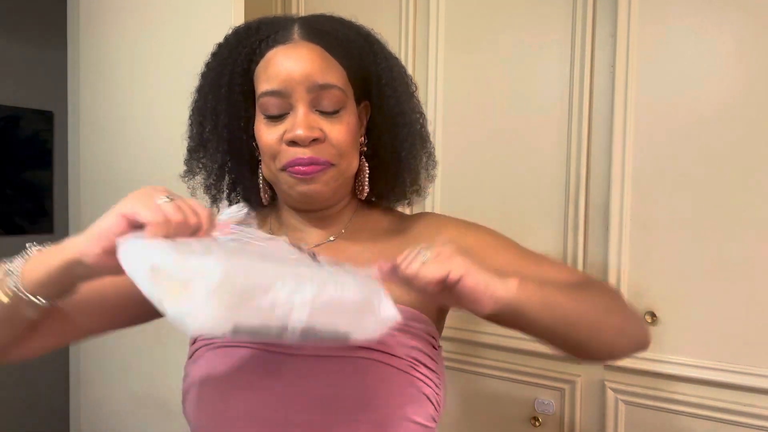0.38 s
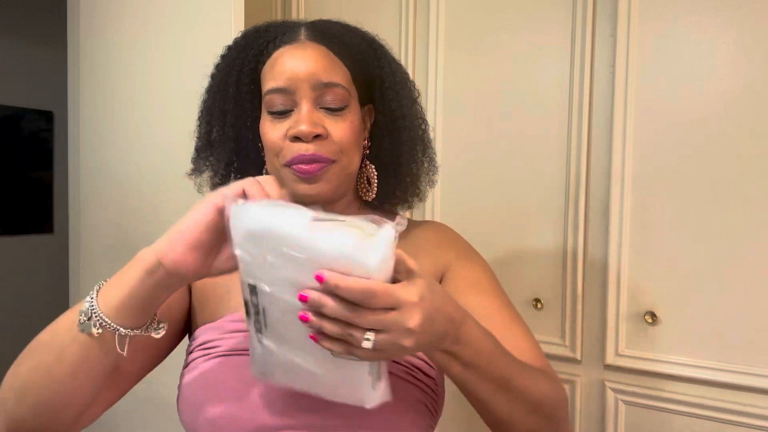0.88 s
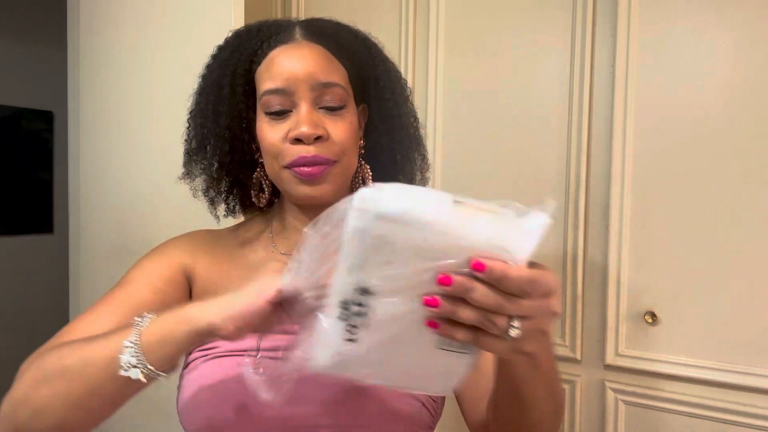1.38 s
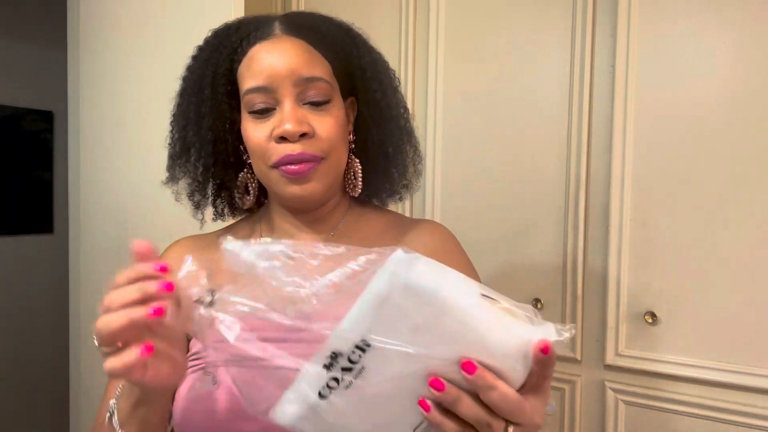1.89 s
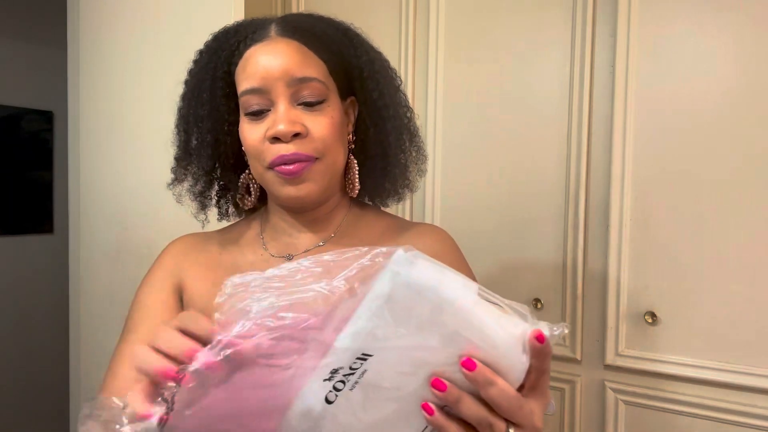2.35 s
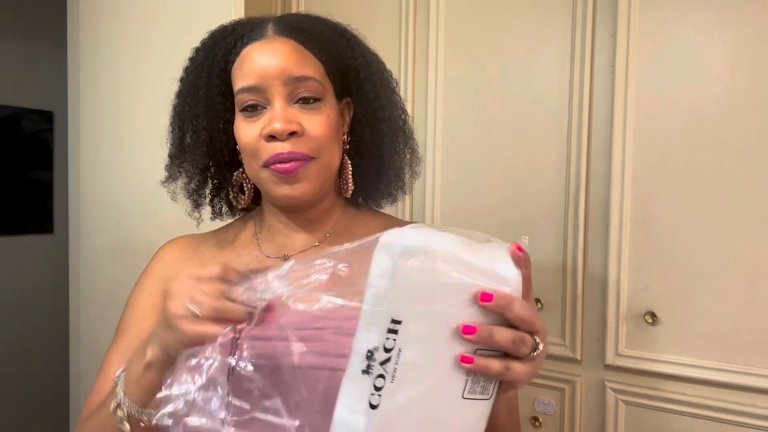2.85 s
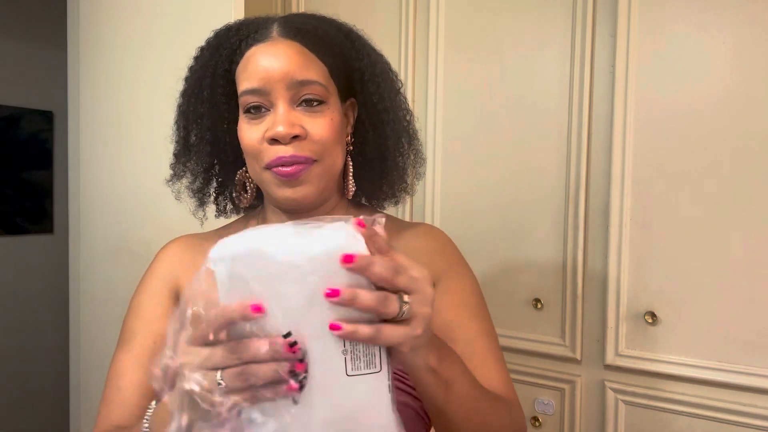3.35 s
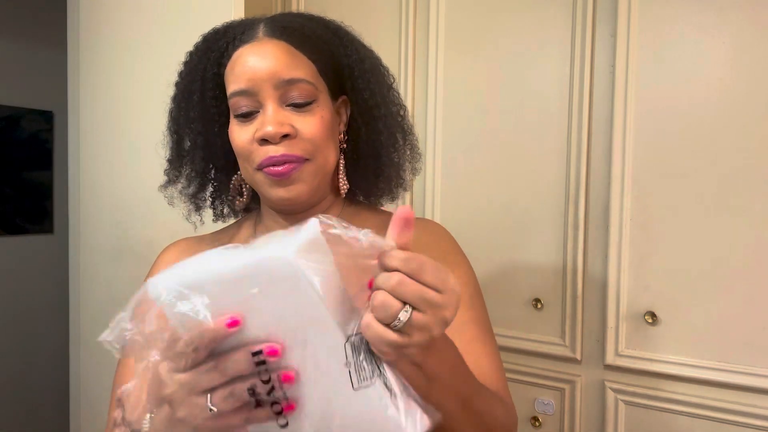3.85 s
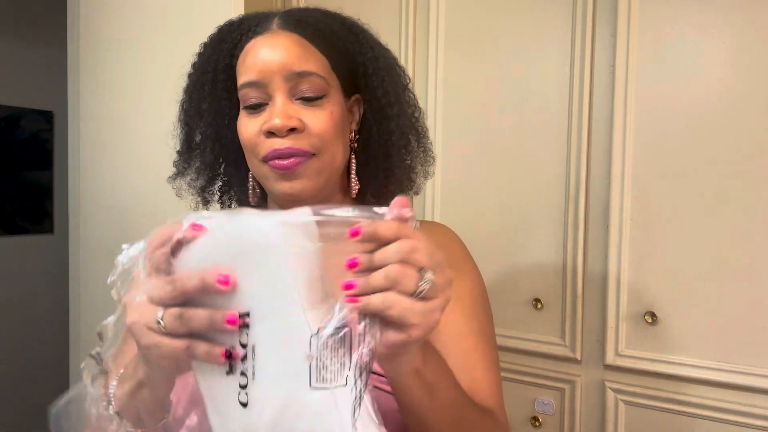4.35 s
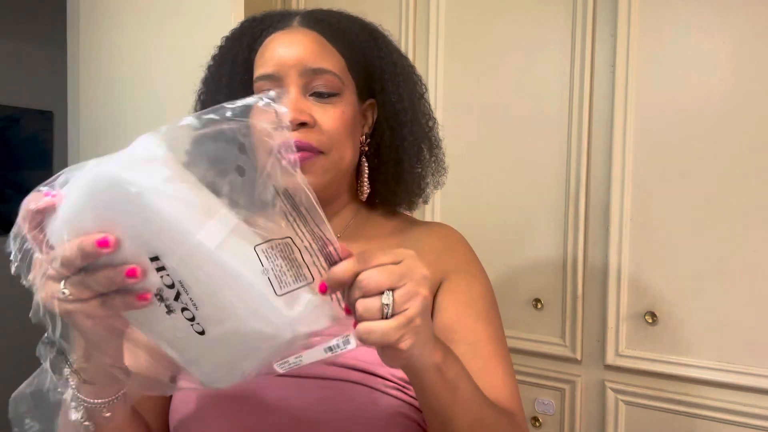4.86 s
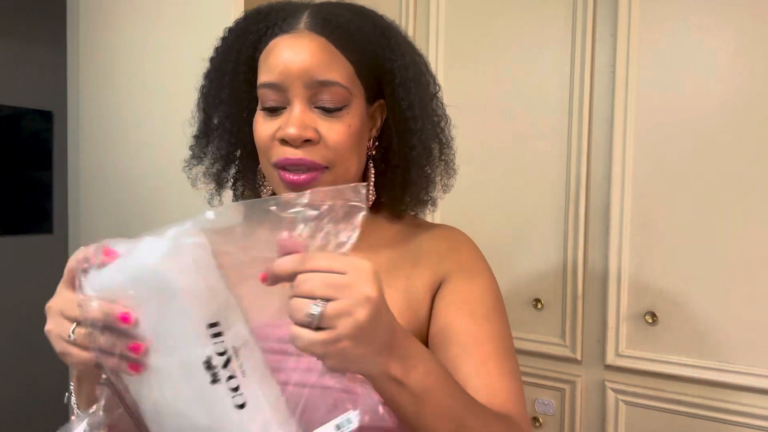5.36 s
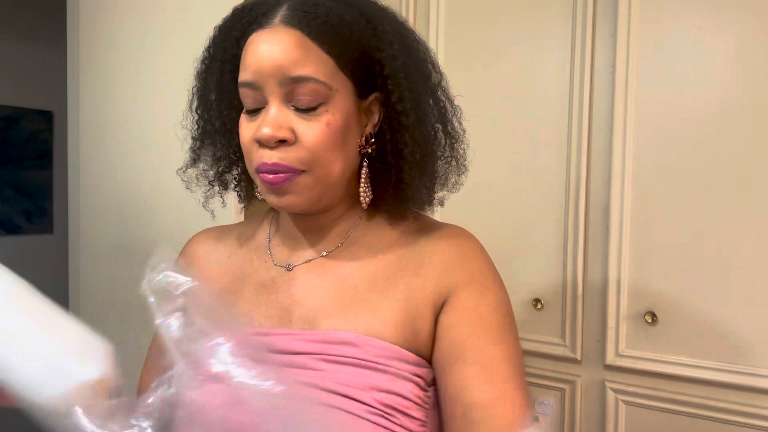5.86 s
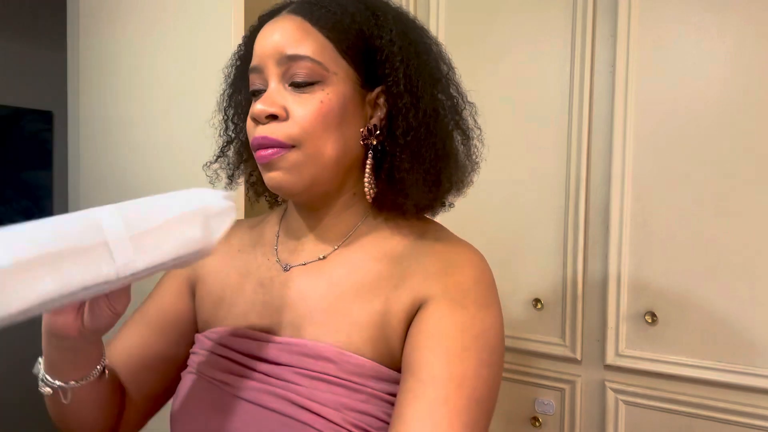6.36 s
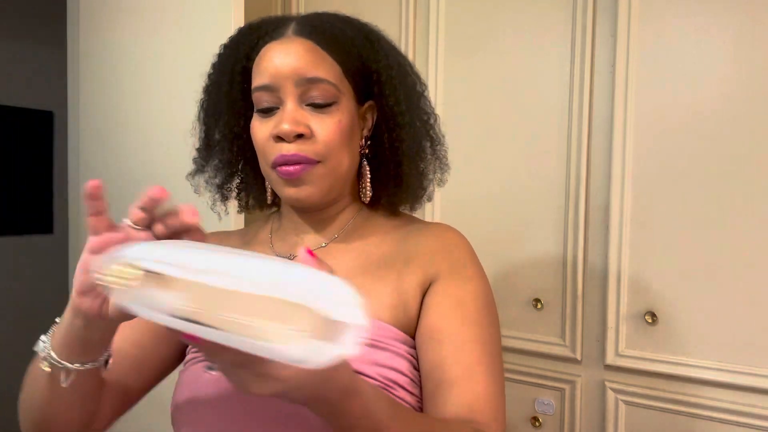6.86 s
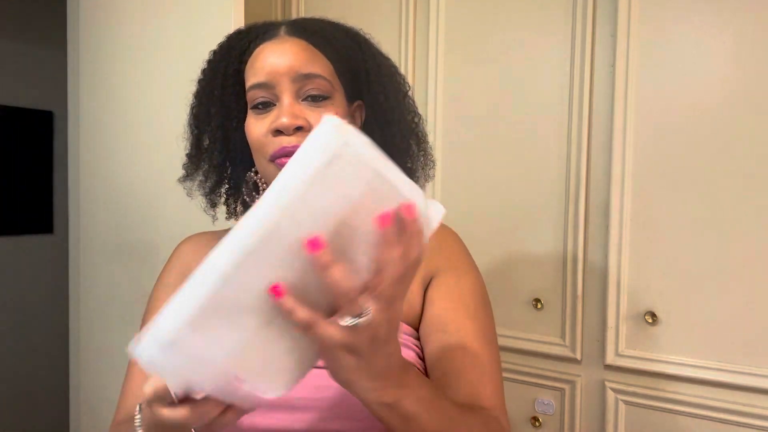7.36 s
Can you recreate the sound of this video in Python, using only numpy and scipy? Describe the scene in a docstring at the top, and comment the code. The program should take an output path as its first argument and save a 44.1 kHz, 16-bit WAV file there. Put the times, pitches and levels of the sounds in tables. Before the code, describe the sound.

A bright, dry rip of plastic film bursts out, then hands crumple and peel the bag away in uneven bursts of crackle, with lone ticks and snaps over it. Muffled bumps and hollow pops come from the parcel, and bracelet charms clink faintly. It ends with much quieter rustling and light handling thuds. Close stereo microphone, short room tails, barely audible hush beneath.

```python
"""In a small furnished room, a thin plastic mailer is ripped open, then pulled and crumpled off a soft parcel.
Random buckles ring many sizes of film patch for the crackle; short noise bursts make the lone snaps. The bag
pops hollow on struck modes, lumpy noise rings the squeezed parcel in low puffs, and bracelet charms clink as
decaying sines. A faint hush lies below. The stereo image varies with pitch, with short tails."""
import sys
import numpy as np
from scipy import signal
from scipy.fft import rfft, irfft, next_fast_len
from scipy.io import wavfile

SR = 44100
rng = np.random.default_rng(int(sys.argv[2]) if len(sys.argv) > 2 else 0)


def put_to_file(sound):
    """Save the sound as 16-bit audio at rate SR, in the file named by the first command-line argument."""
    columns = np.atleast_2d(sound).T  # one column per channel
    safe = np.clip(columns, -1, 1)
    whole_steps = np.round(safe * 32767)
    wavfile.write(sys.argv[1], SR, whole_steps.astype(np.int16))


N = 340716   # length in samples


def from_db(db):
    """Decibels to gain."""
    return 10 ** (np.asarray(db) / 20)


def rms_one(x):
    """Scale to unit rms."""
    return x / np.sqrt(np.mean(x ** 2) + 1e-20)


def at_hz(points, hz, column=1):
    """Read a table column along log frequency."""
    points = np.array(points)
    return np.interp(np.log(hz), np.log(points[:, 0]), points[:, column])


def filtered(x, order, edges_hz, kind="band"):
    """Butterworth filter along the last axis."""
    return signal.sosfilt(signal.butter(order, edges_hz, kind, fs=SR, output="sos"), x)


def drift(rate_hz):
    """Slow random wander of unit rms: noise through two equal low-pass poles."""
    r = np.exp(-2 * np.pi * rate_hz / SR)
    noise = rng.standard_normal(N + 9000)
    return rms_one(signal.lfilter([1], [1, -2 * r, r * r], noise)[9000:])   # drop the filter's run-in


def ring(clicks, hz, t60):
    """A resonator: each unit click starts a decaying sine of height 1."""
    r = from_db(-60 / (t60 * SR))
    w = 2 * np.pi * hz / SR
    return signal.lfilter([0, np.sin(w)], [1, -2 * r * np.cos(w), r * r], clicks + 1e-18)


def swells(s, db, swell_db, fade_db, rest_db):
    """Level in dB over time: gestures swell and fade evenly in dB, and their powers add over a rest level."""
    t = np.arange(0, N + 32, 32) / SR
    tenths = 10 * (t - s[:, None])
    drop_db = np.maximum(-tenths * swell_db[:, None], tenths * fade_db[:, None])
    each_db = db[:, None] - drop_db
    power = np.sum(from_db(2 * each_db), axis=0) + from_db(2 * rest_db)
    return np.interp(np.arange(N) / SR, t, 10 * np.log10(power))


# grips and pulls on the film: t of peak/s, crackle level/dB, swell/dB per 0.1 s, fade/dB per 0.1 s,
# large-fold level/dB re crackle before the folds trim
GRIPS = [(0.0, -41, 1, 12.5, -8), (0.197, -50, 69.5, 40, 12), (0.234, -19.5, 97, 23.5, -13),
         (0.263, -23, 27.5, 17, 2), (0.447, -39.5, 9, 8, 2), (0.776, -50.5, 26, 10, -3),
         (0.879, -41.5, 25, 13, -5), (1.097, -38.5, 21.5, 18, 1.5), (1.205, -52, 42, 2, -2),
         (1.276, -32.5, 148.5, 18, -4), (1.325, -32.5, 58, 16, 2.5), (1.465, -37.5, 7.5, 14.5, 11),
         (1.66, -37.5, 6.5, 15, 0), (1.715, -39, 14, 27, -3), (1.842, -43, 12.5, 18.5, 3.5),
         (2.11, -65.5, -0.5, 45, 0), (2.204, -46.5, 250, 19.5, 5), (2.228, -50.5, 86, 26, -5),
         (2.361, -53.5, 14.5, 42, 5.5), (2.481, -39, 93, 31, -6), (2.519, -46, 30, 47, -6),
         (2.61, -55.5, 15, 10, 5.5), (2.672, -40.5, 120, 37, -5), (2.745, -33.5, 25, 22, 2),
         (2.824, -35.5, 33, 12.5, 4.5), (2.988, -36, 15, 27.5, 0), (3.164, -38, 13, 5.5, 1.5),
         (3.423, -44, 20, 31.5, -4), (3.635, -40, 7, 3, -1), (3.862, -40, 10, 20, 5),
         (3.953, -47.5, 71, 20, 2), (4.052, -39.5, 29, 25, 4.5), (4.134, -35.5, 18.5, 12, 2),
         (4.24, -44.5, 20, 13, 2), (4.383, -42, 9.5, 27, 4), (4.485, -45, 13, 33, 0),
         (4.551, -42.5, 74, 17, -9), (4.626, -40, 13, 7, 1.5), (4.745, -39.5, 30, 30, 5),
         (4.765, -30, 110, 48, 0), (4.922, -40, 8, 7.5, 2), (5.118, -39.5, 33, 17.5, -1),
         (5.214, -37.5, 52, 35, -12), (5.269, -33.5, 37, 19, 1), (5.334, -39, 61, 20, 0),
         (5.413, -36, 16.5, 39, 4), (5.729, -35, 11.5, 11.5, 1.5), (6.0, -56.5, 0.5, 30, 6.5),
         (6.051, -47, 117.5, 21, -2), (6.14, -63, 20, 22, 7), (6.18, -60.5, 50, 20, 7),
         (6.285, -48.5, 150, 26, -1), (6.39, -54.5, 7.5, 26, 9.5), (6.476, -54, 90, 25, 7),
         (6.53, -55.5, 3.5, 55, 4), (6.62, -76, 60, 4, -20), (6.725, -65, 15, 22, -20),
         (6.74, -51.5, 90, 23, 9), (6.885, -52, 7, 30, -3.5), (7.01, -63.5, 36, 4, 14.5),
         (7.072, -56, 39, 22, 11), (7.164, -53.5, 61, 18, 5.5), (7.237, -53, 45, 20, -3),
         (7.356, -49.5, 18, 25, 5), (7.445, -51.5, 9, 10, -4), (7.571, -53, 9, 4.5, -2)]
# level of the fine creases: t/s, level/dB re crackle
TREBLE = [(0.0, -3), (0.31, 0.5), (0.7, -0.5), (0.93, -7), (1.24, 3.5), (1.54, 2.5), (1.85, -2.5),
          (2.16, -10), (2.47, 1), (2.78, -6), (3.4, -2.5), (4.01, -0.5), (4.63, -2), (4.94, 1),
          (5.25, -4.5), (5.56, 2), (5.87, 2), (6.18, 2.5), (6.48, -0.5), (6.79, 6.5), (7.1, -2),
          (7.41, 5.5), (7.72, 6)]
# hiss of sliding film, most in the rip and on the bare tissue wrap: t/s, level/dB re buckles
SLIDING = [(0, -2.5), (.2, 6), (.24, 1.5), (.35, -5), (6.5, -5), (6.9, 2.5), (7.73, 4.5)]


def handling():
    """Grips drive the crackle; large folds give way after the small ones, creases and sliding follow curves."""
    fold_lag_s, folds_trim_db, rest_db = 0.016, -1.5, -88
    s, db, swell_db, fade_db, share_db = np.transpose(GRIPS)
    crackle_db = swells(s, db, swell_db, fade_db, rest_db)
    large_db = swells(s + fold_lag_s, db + share_db + folds_trim_db, swell_db, fade_db, rest_db)
    t = np.arange(N) / SR
    creases_db = np.interp(t, *np.transpose(TREBLE))
    rub_db = np.interp(t, *np.transpose(SLIDING))
    return crackle_db, large_db - crackle_db, creases_db, rub_db


def by_size(hz, folds_db, creases_db):
    """Large folds sound low, fine creases high; their levels blend over pitch."""
    low = np.clip(np.log2(1400 / hz), 0, 1)
    high = np.clip(2 * np.log2(hz / 7000), 0, 1)
    return low * folds_db + high * creases_db


# tone of the crackling film: f/Hz, level/dB per Hz
FILM = [(260, -2), (400, 9), (600, 1.5), (900, 1.5), (1500, 1), (3000, 3), (5500, 1.5), (9300, -5.5),
        (11000, -2), (13000, -1), (15500, 2.5)]


def film(crackle_db, folds_db, creases_db, rub_db):
    """Random buckles and sliding hiss ring film patches of 30 sizes, dealt out to three places."""
    rate_per_s, clump_db, spread_db = 800, 3.0, 3.5   # rate before clumping
    patchy_db, cycles = 2.5, 6.6   # cycles of ringing until 60 dB down
    born = rng.random(N) < rate_per_s * from_db(clump_db * drift(60)) / SR
    sizes = born * from_db(spread_db * np.minimum(rng.exponential(1, N), 4))
    pitches = np.geomspace(270, 15500, 30)
    middle = (pitches > 1200) * (pitches < 7000)
    reference = np.sqrt(np.sum(pitches * from_db(2 * at_hz(FILM, pitches)) * middle))
    colours = [drift(21) for k in range(6)]   # neighbouring sizes of fold wake and rest together
    out = np.zeros((3, N))
    for k, hz in enumerate(pitches):
        buckles = rms_one(sizes * rng.standard_normal(N))   # each buckle moves each patch differently
        hiss = from_db(rub_db) * rng.standard_normal(N)   # film sliding on film
        shake = (buckles + hiss) / np.sqrt(1 + from_db(2 * rub_db))
        ring_rms = np.sqrt(SR * (cycles / hz) / (12 * np.log(10)))   # under unit noise
        tone = from_db(at_hz(FILM, hz)) * np.sqrt(hz) / reference   # sqrt(hz): patches are log spaced
        level_db = crackle_db + by_size(hz, folds_db, creases_db) + patchy_db * colours[k // 5]
        out[k % 3] += ring(shake * tone / ring_rms * from_db(level_db), hz, cycles / hz)
    return filtered(out, 4, 240, "high")   # small patches move no bass


def stray_snaps(crackle_db):
    """Lesser snaps fall at random moments, as strong as the handling allows; rows as in SNAPS."""
    rate_per_s, over_crackle_db, spread_db = 26, 6, 3.5
    folds_db, creases_db = -9, -3
    s = np.cumsum(rng.exponential(1, 200)) / rate_per_s
    peak_db = crackle_db[np.minimum(s * SR, N - 1).astype(int)] + over_crackle_db
    rows = np.c_[s, peak_db, np.full((200, 2), [folds_db, creases_db])]
    rows[:, 1:] += spread_db * rng.standard_normal((200, 3))
    return rows[s < N / SR - .01]


# lone snaps of the film: t/s, level/dB before the part gains, large folds/dB re level, fine creases/dB re level
SNAPS = [(0.1146, -31.5, -16, 3.5), (0.2087, -21, -11, -1), (0.2201, -9.5, -17, 1), (0.2277, -16, -10, -4),
         (0.2416, -11, -19, -13), (0.2655, -17, -9, -7), (0.276, -21, -5, -5), (0.2997, -17, -18, -8),
         (0.3147, -12.5, -9, -12), (0.3512, -28, 1, 10.5), (0.3586, -31, -6, -9), (0.4367, -37, -10, 9),
         (0.4475, -23, -4, -2), (0.5538, -36, -18, 6), (0.5914, -45, -14, 19), (0.6237, -31.5, -16, 9),
         (0.6499, -35, -22, -9.5), (0.6638, -42, -6, 0.5), (0.7011, -32.5, -23, 10),
         (0.7565, -43, -14, 8.5), (0.7728, -27, -22, -5), (0.8803, -24, -12, -5), (1.0551, -32, -15, 4),
         (1.093, -34.5, -19, 2), (1.2158, -25, -23, 0), (1.2732, -25, -12, 1), (1.3027, -23, -13, -12),
         (1.3219, -23, -14, -6), (1.3596, -28, -4, 0), (1.3765, -32, -8, 14), (1.5582, -22, -21, -18),
         (1.5913, -30, -20, 4), (1.7005, -24, -7.5, 0), (1.7201, -26, -19, -14), (1.7814, -37, -15, 12),
         (1.8299, -28, -14, 7), (1.851, -26, 1, -4), (1.8595, -25.5, -12, -9), (2.0795, -40, -15, -7),
         (2.2002, -47, 5, -0.5), (2.2142, -41, -6, -14), (2.2256, -40, -5, 6), (2.3317, -44, -6, -15),
         (2.4603, -43, -7, 11), (2.4734, -46, -8, 12), (2.4847, -23.5, -15, -11), (2.6023, -40.5, -20, 4),
         (2.6614, -25, -18, -5), (2.6668, -29, -20, 1), (2.6952, -39, -16, 4), (2.7065, -30, -12, 10),
         (2.7269, -32, -11, 9), (2.8136, -24, -17, 0), (2.8345, -30, 2, -14), (2.8605, -30, -16, -7),
         (2.8969, -23, -20, -7), (2.9265, -30, -11, 5), (2.9374, -23.5, -16, -10), (2.9728, -29, -14, -3),
         (3.1589, -20, -14, -2), (3.2266, -32, -11, 9), (3.3951, -30, -9, -11), (3.4168, -25, -23, -2),
         (3.5879, -33.5, -19, 9), (3.622, -28, -20, 5), (3.6381, -18.5, -19, 2), (3.6853, -37, -3, 6),
         (3.6985, -33, -1, -15), (3.7092, -30, -14, 7), (3.7502, -27.5, -12, 4), (3.7973, -34, -1, -17),
         (3.8195, -33, 3, -5), (3.839, -33, -10, 7), (3.8452, -31, -14, 9), (3.8581, -25, -15, -14),
         (3.8743, -24, -22, -5), (3.8817, -31, -17, 6), (3.9208, -35, -19, 4), (3.948, -34, -9, 7),
         (4.048, -34, -10, -2), (4.0812, -31, -12, 4), (4.3377, -39, -6, 11), (4.3429, -32, -15, 3),
         (4.4514, -31, -3, -24), (4.464, -30, -18, 4), (4.4824, -21, -14, 1), (4.5436, -27, -10, -6),
         (4.6197, -23, -16, -15), (4.6792, -22.5, -14, 0), (4.6989, -31, -20, 10), (4.7277, -31, -13, -2),
         (4.7456, -27, -10, -9), (4.7624, -15, -25, -5), (4.9618, -34, -18, 8), (4.976, -24.5, -18, -8),
         (5.0108, -32.5, -14, 8), (5.1341, -32, -13, -7), (5.2175, -24.5, -21.5, -18),
         (5.2258, -26, -17, 0), (5.2297, -24, -25, 6), (5.2503, -23, -14, 2), (5.2593, -20, -11, 6),
         (5.3728, -37, -11, 5), (5.4012, -34, -10, 10), (5.42, -26.5, -21, -4), (5.5962, -29.5, -15, -20),
         (5.6395, -29, -3, -6), (5.7374, -17, -23, 2), (5.7961, -31, -21, 9), (5.9617, -39, -5, -4),
         (5.9863, -39, -7, 10.5), (6.0215, -43, -15, 0), (6.0823, -29.5, -20, 1), (6.1383, -47, 0, -15),
         (6.1778, -36.5, -16, -13), (6.1811, -41, -13, 6), (6.2378, -40, -24, -12), (6.2825, -45, -2, 16),
         (6.292, -32, -14, -6), (6.4108, -42, -16, 1), (6.4713, -40.5, 3.5, -4), (6.4775, -40, -9, -19),
         (6.4954, -43, -19.5, 5), (6.5166, -44, -15, 0), (7.0514, -41.5, -7.5, 12), (7.2362, -38, -17, -7),
         (7.3086, -48.5, -13, 10)]
# folds, body and creases of a snap: from f/Hz, to f/Hz, gain/dB
SNAP_PARTS = [(404, 1650, 5.5), (1240, 5960, 6), (7000, 15700, 8)]


def snaps(crackle_db):
    """A snap is a very short dying run of buckles in three sizes of fold; snaps take turns among four places."""
    burst_s = 0.00027
    s, db, folds_db, creases_db = np.transpose(np.vstack([SNAPS, stray_snaps(crackle_db)]))
    steps = np.arange(SR // 120)
    bursts = rng.standard_normal((len(s), len(steps))) * np.exp(-steps / SR / burst_s)
    bursts[:, 0] = 4.0 * np.sign(bursts[:, 0])   # a strong first buckle
    at = np.round(s * SR).astype(int)[:, None] + steps
    place = np.arange(len(s))[:, None] % 4
    out = np.zeros((4, N))
    for (low_hz, high_hz, part_db), share_db in zip(SNAP_PARTS, [folds_db, 0, creases_db]):
        shapes = filtered(bursts, 2, [low_hz, high_hz])
        shapes /= np.abs(shapes).max(axis=1, keepdims=True)
        np.add.at(out, (place, at), from_db(db + share_db + part_db)[:, None] * shapes)
    return out


# hollow pops as a fold flips or a hand lands: t/s, level/dB before trim and mode levels,
# deep part/dB re level, hollow f/Hz
POPS = [(0.195, -29, -19, 721), (0.224, -24.5, -25, 466), (0.351, -22, -31, 466), (0.834, -41, -7, 301),
        (1.272, -38, -23, 493), (1.281, -32.5, -26, 487), (1.322, -28, -21, 890), (1.423, -26, -20, 474),
        (1.699, -31.5, -20, 581), (1.83, -30, -26, 500), (2.203, -45.5, -18, 466), (2.743, -32, -17, 549),
        (3.132, -29.5, -26, 431), (3.195, -34, -15, 476), (3.795, -34.5, -20, 611), (4.125, -34, -21, 509),
        (4.141, -34, -17, 603), (4.373, -35.5, -22, 463), (4.451, -36, -27, 470), (4.766, -24.5, -12, 398),
        (5.102, -34.5, -14, 500), (5.278, -30, -11, 565), (5.326, -30.5, -16, 447),
        (5.715, -32.5, -11, 490), (6.73, -46.5, -1, 310), (7.331, -45, -17, 307), (7.342, -41.5, -18, 549),
        (7.364, -42.5, -16, 431), (7.493, -43, -17, 401), (7.585, -42.5, -28, 466)]
# modes of the bag with the hollow at 500 Hz: f/Hz, level/dB, t60/s
BAG = [(111, 4, 0.044), (161, 0, 0.057), (300, -3, 0.07), (421, -1, 0.06), (501, 5, 0.055), (640, -5, .03),
       (950, -5, 0.018), (1300, -5, 0.013)]


def pops():
    """Each pop strikes the bag's modes; the upper ones shift with the size of the hollow at that moment."""
    trim_db, scatter_db, rise_s = -3.0, 2.6, 0.002
    s, db, deep_db, hollow_hz = np.transpose(POPS)[:, :, None]
    hz, level_db, t60 = np.transpose(BAG)
    steps = np.arange(SR // 10)
    t = steps / SR
    deep = hz < 200   # these modes keep their pitch
    pitches = np.where(deep, hz, hz * hollow_hz / 500)[:, :, None]
    scatter = scatter_db * rng.standard_normal((len(s), len(hz)))
    strengths_db = db + trim_db + level_db + deep_db * deep + scatter
    decays = from_db(strengths_db[:, :, None] - 60 * t / t60[:, None])
    signs = (-1) ** np.arange(len(hz))[:, None]
    rings = np.sum(decays * np.sin(2 * np.pi * pitches * t) * signs, axis=1)
    rings *= 1 - np.exp(-t / rise_s)
    out = np.zeros(N + len(steps))
    np.add.at(out, np.round(s * SR).astype(int) + steps, rings)
    return filtered(out[:N], 2, [70, 1800])   # a soft contact


# squeezes of the parcel: t of peak/s, puff level/dB, swell/dB per 0.1 s, fade/dB per 0.1 s
SQUEEZES = [(0.237, -46, 49.0, 36.0), (0.373, -55.0, 11, 33.0), (0.429, -57.5, 35.0, 2.5),
            (0.844, -53.5, 18, 16.0), (1.01, -54, 33.5, 36.0), (1.083, -57.5, 57.0, 12.0),
            (1.438, -43.5, 17, 7), (1.663, -48.5, 22.0, 5.5), (2.146, -62, 40, 6), (2.287, -63, 100, 5),
            (2.512, -57.5, 33, 18.0), (2.764, -45, 19, 10), (2.882, -43.5, 27.0, 28),
            (2.996, -47, 33.0, 19), (3.248, -46.5, 9, 21), (3.833, -57.5, 2, 14), (4.019, -53, 25.5, 25.5),
            (4.159, -51, 5, 14), (4.427, -59, 5.0, 23.0), (4.518, -51.5, 48, 48.0), (4.702, -48.0, 6, 41.0),
            (4.781, -34, 56, 24), (4.956, -41, 16, 15), (5.115, -47, 74.0, 13.5), (5.281, -41.5, 51.0, 7.5),
            (5.446, -43.5, 9, 41), (5.746, -41, 21.5, 38.0), (5.866, -46.5, 15.5, 9),
            (6.143, -59, 33.0, 10), (6.39, -64.5, 6.0, 20), (6.478, -52.5, 34, 17), (6.738, -43, 135, 19),
            (7.101, -49, 32, 17.0), (7.171, -45, 57.0, 26), (7.371, -55, 29, 29.0), (7.5, -53, 40.0, 26.0)]
# low resonances of bag and parcel: f/Hz, width/Hz, level/dB before the band filter
PUFF = [(73, 18, -3.5), (113.5, 25.6, 8), (152, 28, -2.5)]


def puffs():
    """Squeezed air and soft bumps come in lumps and ring the parcel briefly."""
    lump_db, rest_db = 2.5, -73.5
    push = rng.standard_normal(N) * from_db(lump_db * drift(25))
    body = sum(from_db(db) * rms_one(ring(push, hz, 2.05 / width)) for hz, width, db in PUFF)
    puff_db = swells(*np.transpose(SQUEEZES), rest_db)
    return from_db(puff_db) * rms_one(filtered(body, 3, [45, 180]))


# bracelet charms touching: t/s, level/dB before mode levels, middle mode/dB re level, top modes/dB re level
CLINKS = [(1.776, -40.5, -9, -10), (2.0388, -47, -12, 0), (2.2236, -46, -4, -8), (2.438, -49, -10, -2),
          (2.666, -55, -15, -12), (3.148, -50, -15, -10), (3.4426, -42.5, -15, -10), (3.843, -50, 1.5, 16),
          (3.963, -51, -12, -10.5), (4.1634, -43, -12, -10), (4.1754, -31, -20, -14), (6.046, -44, -7, -10),
          (6.279, -45, -11, -6), (7.0507, -46, -9, -7.5), (7.1302, -53, -15, -10),
          (7.3103, -56.5, 13.5, -10)]
# modes of a charm: f/Hz, level/dB, t60/s
CHARM = [(7666, 4, .21), (7702, -1, .09), (11070, 2, .11), (14300, 2, .04), (15600, -1, .03)]


def bracelet():
    """Each touch rings the modes of a charm; the lowest is a close pair that beats."""
    s, db, middle_db, top_db = np.transpose(CLINKS)
    shares_db = [0, 0, middle_db, top_db, top_db]
    out = np.zeros(N)
    for k, ((hz, level_db, t60), share_db) in enumerate(zip(CHARM, shares_db)):
        clicks = np.zeros(N)
        clicks[np.round(s * SR).astype(int)] = from_db(db + level_db + share_db)
        out += ring(clicks, hz, t60) * (-1) ** k
    return out


# colour of the room tone: f/Hz, level/dB per Hz before scaling to the overall level
AIR = [(40, -1.5), (110, 6), (300, -8.5), (700, -23), (4000, -20), (15000, -6)]


def room_tone():
    """A faint steady hush: noise shaped in frequency, at an rms of -72.5 dB."""
    hz = np.maximum(np.arange(N // 2 + 1) * SR / N, 1)
    spectrum = rfft(rng.standard_normal(N)) * from_db(at_hz(AIR, hz))
    return from_db(-72.5) * rms_one(irfft(spectrum, N))


# stereo image by pitch: f/Hz, share alike in both channels/0-1, phase of left over right/rad,
# level of left over right/dB
STEREO_IMAGE = [(60, .9, 0, 1), (160, .82, 0, 1.5), (320, .7, 0, -1.5), (700, .5, 0, -.5),
                (2000, .45, -.7, -.5), (5000, .35, -2.6, -1.5), (6900, .75, -.1, -1.5), (7700, .9, .8, -1),
                (8600, .99, 3.0, 0), (9900, .995, 3.25, 0), (10500, .8, 4.4, 0), (11200, .99, 6.15, 0),
                (12400, .995, 6.4, 0), (13200, .85, 7.8, 0), (13900, .995, 9.35, 0), (15200, .99, 9.55, 0),
                (15700, .8, 10.6, -1)]


def heard(x, t60):
    """One share is alike in both channels but for phase and level; the rest is a short noise tail of each."""
    size = next_fast_len(N + SR // 2)
    hz = np.maximum(np.arange(size // 2 + 1) * SR / size, 1)
    alike = np.clip(at_hz(STEREO_IMAGE, hz), 0, 1)
    sides = np.array([[.5], [-.5]])   # left and right take half of each difference
    phase = np.exp(1j * at_hz(STEREO_IMAGE, hz, column=2) * sides)
    balance = from_db(at_hz(STEREO_IMAGE, hz, column=3) * sides)
    tail = rng.standard_normal((2, SR // 4)) * from_db(-60 * np.arange(SR // 4) / SR / t60)
    tail /= np.sqrt(np.sum(tail ** 2, axis=1, keepdims=True))
    path = np.sqrt(alike) * phase + np.sqrt(1 - alike) * rfft(tail, size)
    return irfft(rfft(x, size) * path * balance, size)[:, :N]


def scene():
    """Bag, parcel, wrist and room are heard with room tails; snaps stand out over their nearest echoes."""
    room_t60_s, bag_face_t60_s = 0.079, 0.006
    crackle_db, folds_db, creases_db, rub_db = handling()
    film_1, film_2, film_3 = film(crackle_db, folds_db, creases_db, rub_db)
    by_wrist = film_1 + bracelet()
    by_parcel = film_2 + puffs() + pops() + room_tone()
    diffuse = sum(heard(x, room_t60_s) for x in (by_wrist, by_parcel, film_3))
    return diffuse + sum(heard(x, bag_face_t60_s) for x in snaps(crackle_db))


def top_cut(x):
    """Nothing passes above the cut-off."""
    return signal.sosfilt(signal.butter(12, 17140, fs=SR, output="sos"), x)


def record(dry):
    """The top is cut steeply at 15.9 kHz."""
    mix = signal.sosfilt(signal.ellip(10, .5, 32, 15900, fs=SR, output="sos"), dry)
    return top_cut(mix)


dry = scene()
out = record(dry)
put_to_file(out)
```